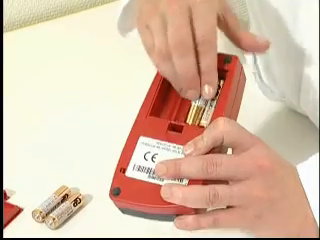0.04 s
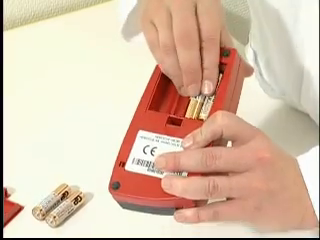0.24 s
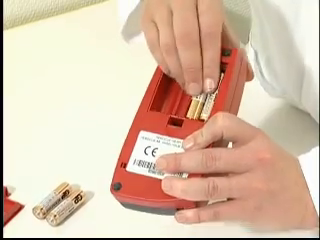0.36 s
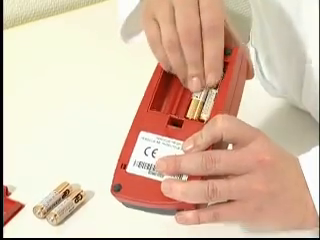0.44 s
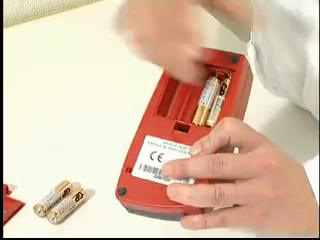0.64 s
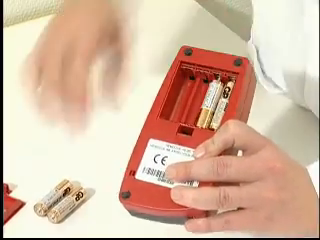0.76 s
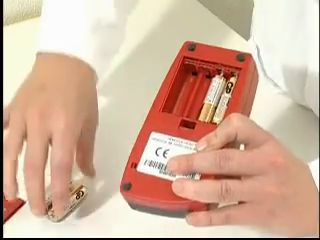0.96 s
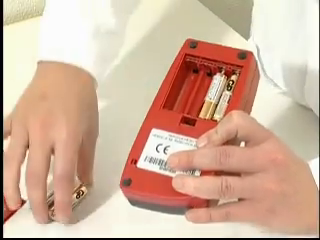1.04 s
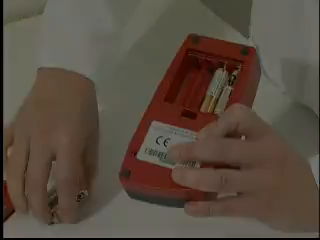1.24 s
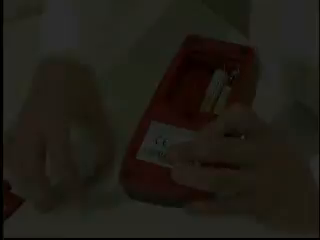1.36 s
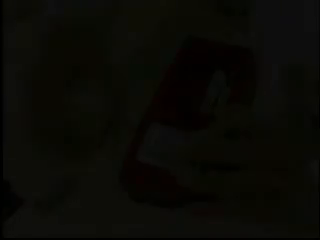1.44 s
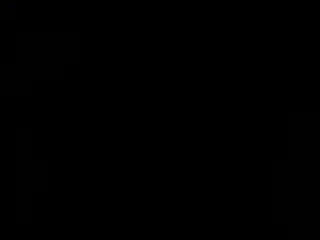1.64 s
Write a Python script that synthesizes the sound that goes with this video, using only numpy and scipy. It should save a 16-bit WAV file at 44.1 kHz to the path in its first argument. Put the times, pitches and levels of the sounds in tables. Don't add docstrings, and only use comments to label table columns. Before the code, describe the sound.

Two batteries snap into a plastic compartment at about 0.24 and 0.46 seconds, each a bright, very short rattling click, the second stronger, with a lively hard-room tail. Much fainter, a hand knocks and rubs on the table from 0.9 to 1.15, a loose battery tips at 1.22-1.35, and a dull thump comes near 1.68. Close, nearly mono microphone; low hiss, hum and thin high whine throughout.

```python
import sys
import numpy as np
from scipy import signal
from scipy.fft import rfft, irfft
from scipy.io import wavfile
from scipy.ndimage import uniform_filter1d

SR = 44100
rng = np.random.default_rng(int(sys.argv[2]) if len(sys.argv) > 2 else 0)


def gain_from_decibels(decibels):
    exponent = np.asarray(decibels, float) / 20
    return 10 ** exponent


def output_pcm(signal):
    pcm = np.clip(np.atleast_2d(signal).T, -1, 1) * 32767
    wavfile.write(sys.argv[1], SR, np.round(pcm).astype(np.int16))


N = 74970

# (time [s], level [dB], brightness [dB per octave])
SNAP_A_CONTACTS = [
    (.2415, -48.5, -2),
    (.2456, -36, -3),
    (.2484, -14, 1),
    (.2489, -16, 1.5),
    (.2494, -14, 1.5),
    (.2502, -16, 9),
    (.2515, -16, -2),
    (.2526, -21.5, -1),
    (.2553, -23, 0),
    (.2585, -30.5, -2),
]
SNAP_B_CONTACTS = [
    (.4572, -40, 3),
    (.4582, -16, 1.5),
    (.4593, -12, -1),
    (.4603, -22.5, -5),
    (.4613, -16.5, -4),
    (.4640, -24.5, 6),
    (.4664, -22.5, -4.5),
    (.4700, -22, 3.5),
]
# (frequency [Hz],
# level [dB], t60 [s])
SNAP_A_MODES = [(590, -27, 0.013), (717, -28, 0.038), (1214.6, -6, 0.035), (1482, -7.5, 0.029),
                (2004, -1.5, 0.024), (2310, -8.5, 0.056), (2766, -10, .02), (3430, -6, 0.013),
                (3810, -4, .02), (4088, -6.5, 0.024),
                (4695, -11, 0.014), (5400, 1.5, .018), (6070, 0.5, 0.02), (7000, -2.5, 0.033),
                (7640, 0, .018), (9450, -5.5, 0.0091), (10200, 1.5, 0.0094), (11300, -13.5, 0.014),
                (12300, -13, 0.018), (12800, -6.5, .007), (15100, -13, .014)]
SNAP_B_MODES = [(310, -32, 0.017), (568.4, -25, 0.046), (720, -24, 0.066), (920, -15.5, 0.022),
                (1330, -5.5, 0.016), (1487, 1.5, 0.037), (1608, 1.5, 0.03), (2281, 0.5, .012),
                (2540, -2.5, 0.011), (2820, -9.5, .013),
                (3435, -11.5, 0.028), (3880, -0.5, 0.021), (4440, -8.5, 0.018), (5520, -2.5, 0.024),
                (6240, -10, 0.019), (6650, -3.5, .022), (8260, -8, 0.012), (8970, -7, 0.028),
                (9980, -8, 0.025), (11540, -14, 0.015), (12400, -15, .016), (14100, -18.5, .022),
                (15300, -21, .022)]
# (frequency [Hz], level [dB per Hz])
CRACK_A_COLOUR = [(250, -44), (900, -24), (1250, -6.5), (3500, 1), (7570, -7), (8600, -8), (10400, -11.5),
                  (16000, -27)]
CRACK_B_COLOUR = [(200, -49.5), (450, -42.5), (1530, -7.5), (1870, -18.5), (2250, -4.5), (3760, -4),
                  (9750, -12.5), (16000, -30)]
# (frequency [Hz], level [dB per Hz])
SPILL_A_COLOUR = [(250, -47.5), (650, -5), (1000, -14), (1250, -4.5), (7800, -7.5), (10200, -15),
                  (15200, -23.5), (16200, -45)]
SPILL_B_COLOUR = [(250, -26), (1150, -10.5), (1570, -1), (1850, -18), (2150, -7), (8000, -19),
                  (12500, -31.5), (14500, -52.5)]
# (frequency [Hz], level [dB])
DIPS_A = [(8200, 1), (8650, -24.5), (9200, -1), (13300, 0), (14200, -18), (14800, 0.5)]
DIPS_B = [(10200, 0), (10700, -9), (11300, 0), (13300, 0), (14000, -11), (14500, 0)]

# (time [s], level [dB], contact [ms])
HAND_KNOCKS = [(0.885, -66, 2.5), (.902, -60, 2), (.916, -49.5, 1.1), (.924, -44, 0.89),
               (0.938, -43.5, 0.81), (.952, -54, 1.3), (.969, -41.5, 0.69), (.985, -52, 1.2),
               (1.0, -40, 0.8), (1.009, -46, 0.8), (1.035, -49.5, 1.1), (1.056, -59, 1.4),
               (1.085, -63, 2.6), (1.112, -62, 1.2), (1.14, -70, 1.4)]
# (time [s], level [dB], contact [ms])
HEEL_LEANS = [
    (.885, -57, 1.4),
    (.93, -54, 1.7),
    (1.03, -58, 3),
    (1.07, -49.5, 3.8),
    (1.155, -59, 3),
]
# (time [s], level [dB], contact [ms])
CELL_NUDGES = [
    (.004, -64.5, .3),
    (.03, -62, 0.49),
    (.058, -71.5, .08),
]
# (time [s], level [dB], contact [ms])
BATTERY_TIPS = [
    (1.222, -43.5, 0.23),
    (1.231, -42.5, 0.2),
    (1.243, -39.5, 1),
    (1.262, -51, 0.66),
    (1.352, -59, 0.63),
]
# (time [s], level [dB], contact [ms])
ARM_THUMPS = [
    (1.665, -62, 4.3),
    (1.686, -52.5, 1.2),
]
# (frequency [Hz], level [dB], t60 [s])
TABLE_MODES = [(227, -9.5, 0.05), (437, 6, 0.061), (505, 1.5, 0.079), (596, -5, 0.044), (710, -8.5, 0.07),
               (810, -19, 0.038), (935, -6, 0.082), (1290, -16, .04), (1650, -14, 0.044)]
BOARD_MODES = [(140.4, -0.5, 0.14), (165, -1, 0.13), (232, -3, 0.11)]
SEAT_MODES = [(688.5, -0.5, .06), (1170, -2, .04), (1500, -5, 0.044), (2100, -8, 0.034), (3840, -15, .03),
              (4690, -6, .04), (5270, -7.5, 0.049)]
LOOSE_BATTERY_MODES = [(314, -12.5, 0.081), (559, -3, 0.063), (645, -9, 0.074), (807, -3, 0.053),
                       (956, -1.5, 0.024), (1216, 2.5, 0.017), (1607, -7.5, 0.032), (1890, -17, 0.023)]
FRAME_MODES = [(51.6, 7, 0.33), (110, 3, 0.18), (230, -14, 0.059), (383, -18, .05)]
# (time [s], level [dB])
RUB_LEVEL = [(0.87, -80), (.91, -69), (0.935, -55), (.97, -56), (1.021, -56), (1.099, -61), (1.199, -67),
             (1.23, -66), (1.4, -76.5), (1.65, -109), (1.673, -89), (1.7, -68)]
# (frequency [Hz], level [dB per Hz])
RUB_COLOUR = [(59, -36), (100, -15.5), (221, -6.5), (309, -19), (426, -2.5), (565, -13.5), (958, -12.5),
              (9000, -45), (11700, -79), (19800, -120)]

# (frequency [Hz], t60 [s])
ROOM_DECAY = [(200, 0.12), (500, 0.58), (1400, 0.53), (3700, 0.46), (7000, 0.34), (10000, 0.33),
              (15000, 0.2)]
# (frequency [Hz], level [dB per Hz])
HISS_COLOUR = [(20, -2), (100, -3.5), (300, -13), (700, -22.5), (960, -21.5), (1300, -25), (10800, -30.5),
               (11600, -54)]
# (frequency [Hz], level [dB rms])
WHINE_LINES = [(96.9, -85), (899.0, -85), (995.9, -83.5), (1497, -94.5), (7133, -101), (7827, -102),
               (11725, -85.5), (15625, -74.5)]
# (from [s], to [s])
WIDE_STRETCHES = [
    (.1, 0.14),
    (0.302, 0.64),
    (0.602, 0.68),
    (.74, 0.8),
    (.92, 1.05),
    (1.09, 1.13),
    (1.16, 1.2),
    (1.24, 1.3),
    (1.34, 1.33),
    (1.54, 1.59),
]


def snap(contacts, modes, crack_colour, crack_db, thin_hz, spill, spill_db, share_db, dips):
    crack_t60, top_hz = 0.015, 15000
    t = np.arange(N) / SR
    close = np.zeros(N)
    noise = evened(tinted(rng.standard_normal(N), crack_colour))
    for start, db, tilt_db in contacts:
        fade = gain_from_decibels(crack_db - 60 * np.abs(t - start) / crack_t60)
        crack = noise * (t >= start) * fade
        close += gain_from_decibels(db) * (ring(modes, start, tilt_db) + crack)
    band = signal.butter(4, [thin_hz, top_hz], "band", fs=SR, output="sos")
    close = signal.sosfilt(band, close)
    click = 1.0 * (np.arange(N) == round(contacts[3][0] * SR))
    blow = tinted(tinted(click, spill), dips)
    to_room = gain_from_decibels(spill_db) * blow / np.linalg.norm(blow) + gain_from_decibels(share_db) * close
    return close, to_room


def ring(modes, start, tilt_db, rise_s=1 / SR):
    spread_db, longest = 3.0, 12000
    hz, db, t60 = np.transpose(modes)[:, :, None]
    first = round(start * SR)
    t = np.maximum(np.arange(N) / SR - start, 0)[first:][:longest]
    db = db + tilt_db * np.log2(hz / 3000)
    luck = rng.standard_normal((2, len(modes), 1))
    level = np.sign(luck[0]) * gain_from_decibels(db + spread_db * luck[1] - 60 * t / t60)
    tones = level * np.sin(2 * np.pi * hz * t)
    out = np.zeros(N)
    out[first:][:longest] = tones.sum(axis=0) * np.minimum(t / rise_s, 1)
    return out / np.sqrt(np.sum(gain_from_decibels(db) ** 2))


def hand():
    touches = knocks(HAND_KNOCKS, TABLE_MODES) + knocks(HEEL_LEANS, BOARD_MODES)
    touches += knocks(CELL_NUDGES, SEAT_MODES) + knocks(BATTERY_TIPS, LOOSE_BATTERY_MODES)
    touches += knocks(ARM_THUMPS, FRAME_MODES)
    grain = gain_from_decibels(1.0 * evened(uniform_filter1d(rng.standard_normal(N), size=300)))
    level = gain_from_decibels(np.interp(np.arange(N) / SR, *np.transpose(RUB_LEVEL), left=-120))
    rub = level * evened(grain * tinted(rng.standard_normal(N), RUB_COLOUR))
    return touches + rub


def knocks(contacts, modes):
    swell_s = 0.0044
    out = np.zeros(N)
    for start, db, ms in contacts:
        push = np.exp(-8 * (np.arange(-600, 601) / SR / (ms / 1000)) ** 2)
        touch = ring(modes, start, 0, swell_s)
        out += gain_from_decibels(db) * signal.fftconvolve(touch, push / push.sum(), "same")
    return out


def room(x, wet_db):
    pre_s, build_s, side_db = 0.0028, 0.0045, -18
    hz, t, bands = signal.stft(rng.standard_normal((2, SR)), SR, nperseg=256)
    fade = gain_from_decibels(-60 * t / read(ROOM_DECAY, hz)[:, None])
    tail = signal.istft(bands * fade, SR, nperseg=256)[1]
    tail = tail * np.clip((np.arange(tail.shape[1]) / SR - pre_s) / build_s, 0, 1)
    tail = tail / np.linalg.norm(tail[0])
    mid, side = signal.fftconvolve(x[None], tail, axes=1)[:, :N + SR]
    return gain_from_decibels(wet_db) * np.array([mid, gain_from_decibels(side_db) * side])


def floor():
    hiss_db, hiss_side_db, whine_side_db = -70, -18, -12.5
    air_db, waver = -24.5, 0.3
    hiss = tinted(rng.standard_normal((2, N)), HISS_COLOUR)
    hiss = hiss / hiss[0].std() + gain_from_decibels(air_db) * rng.standard_normal((2, N))
    out = gain_from_decibels(hiss_db) * hiss * gain_from_decibels(np.array([[0], [hiss_side_db]]))
    t = np.arange(N) / SR
    for hz, db in WHINE_LINES:
        sway = 1 + waver * evened(uniform_filter1d(rng.standard_normal(N), size=2500))
        line = np.sqrt(2) * gain_from_decibels(db) * sway * np.sin(2 * np.pi * (hz * t + rng.random()))
        out += line * gain_from_decibels(np.array([[0], [whine_side_db]]))
    return out


def evened(x):
    return x / np.sqrt(np.mean(x ** 2) + 1e-20)


def read(points, hz):
    f, value = np.transpose(points)
    return np.interp(np.log(hz + 1), np.log(f + 1), value)


def tinted(x, colour):
    gain = gain_from_decibels(read(colour, np.fft.rfftfreq(x.shape[-1], 1 / SR)))
    return irfft(rfft(x) * gain, x.shape[-1])


def scene():
    close_a, far_a = snap(SNAP_A_CONTACTS, SNAP_A_MODES, CRACK_A_COLOUR, crack_db=-14,
                          thin_hz=384, spill=SPILL_A_COLOUR, spill_db=-5, share_db=-32, dips=DIPS_A)
    close_b, far_b = snap(SNAP_B_CONTACTS, SNAP_B_MODES, CRACK_B_COLOUR, crack_db=-4,
                          thin_hz=244, spill=SPILL_B_COLOUR, spill_db=0, share_db=-30, dips=DIPS_B)
    touches = hand()
    mix = floor() + room(far_a, 0)[:, :N] + room(far_b, 0)[:, :N] + room(touches, -7)[:, :N]
    skip = round((SNAP_A_CONTACTS[0][0] + 0.3) * SR)
    mix += room(far_a, 5.5)[:, skip:skip + N]
    side_db = -30.5
    mix += (close_a + close_b + touches) * np.array([[1], [gain_from_decibels(side_db)]])
    lean_hz, lean_db = 1550, -19
    mix[1] += gain_from_decibels(lean_db) * signal.lfilter(*signal.iirpeak(lean_hz, 4.0, fs=SR), close_b)
    mid, side = mix
    return np.array([mid + side, mid - side])


def low_pass(x):
    return signal.sosfilt(signal.butter(12, 16810, fs=SR, output="sos"), x)


def record(dry):
    widen_s, edge_hz = 0.012, 16600
    t = np.arange(N) / SR
    wide = sum(np.clip(np.minimum(t - a, b - t) / widen_s, 0, 1) for a, b in WIDE_STRETCHES)
    mid = (dry[0] + dry[1]) / 2
    side = wide * (dry[0] - dry[1]) / 2
    lowpass = signal.firwin(511, edge_hz, window=("kaiser", 9), fs=SR)
    mix = signal.oaconvolve([mid + side, mid - side], lowpass[None], "same")
    return low_pass(mix)


dry = scene()
out = record(dry)
output_pcm(out)
```